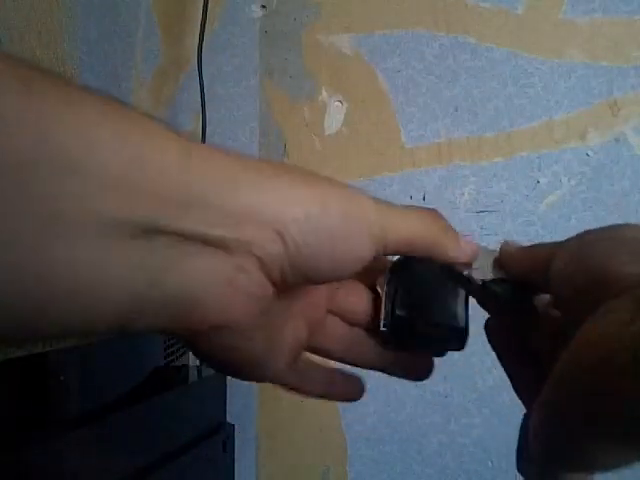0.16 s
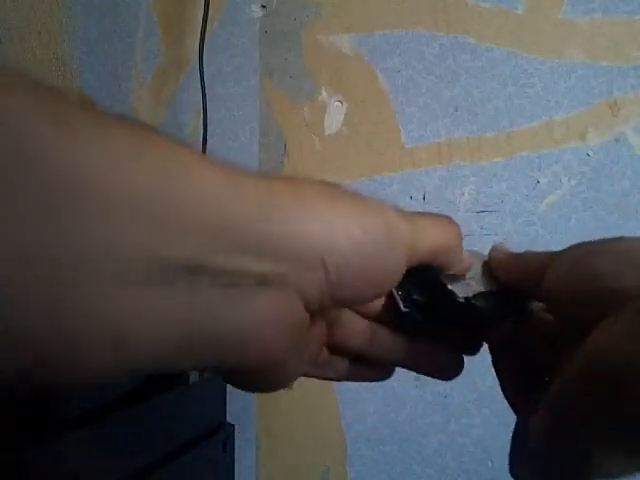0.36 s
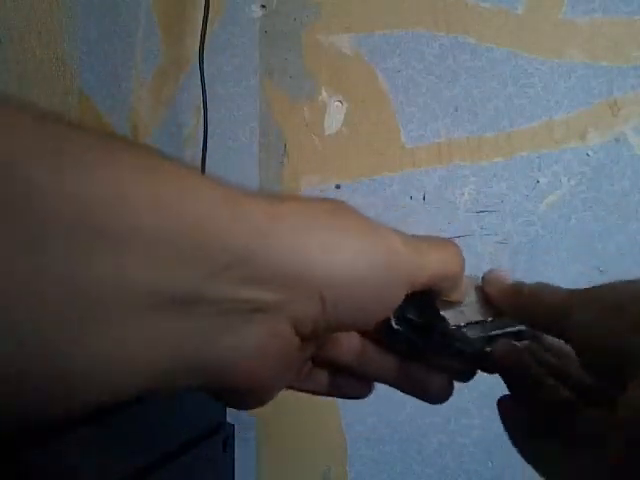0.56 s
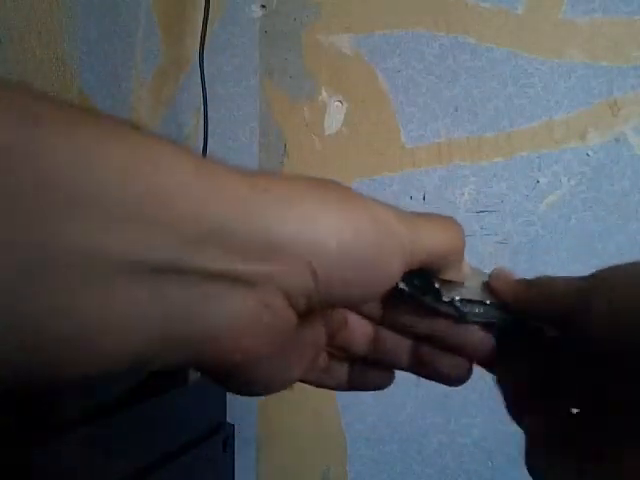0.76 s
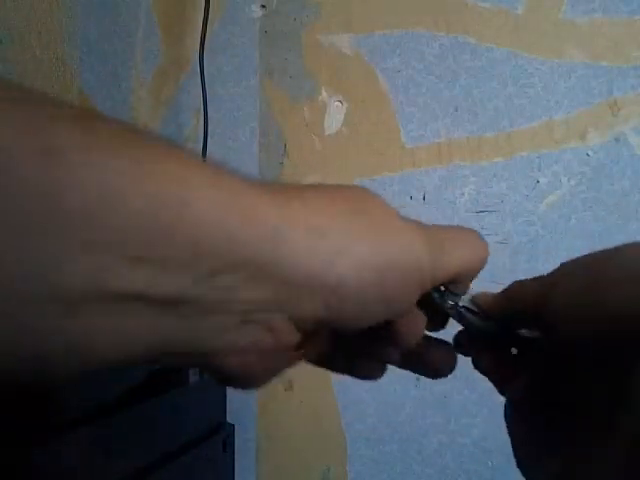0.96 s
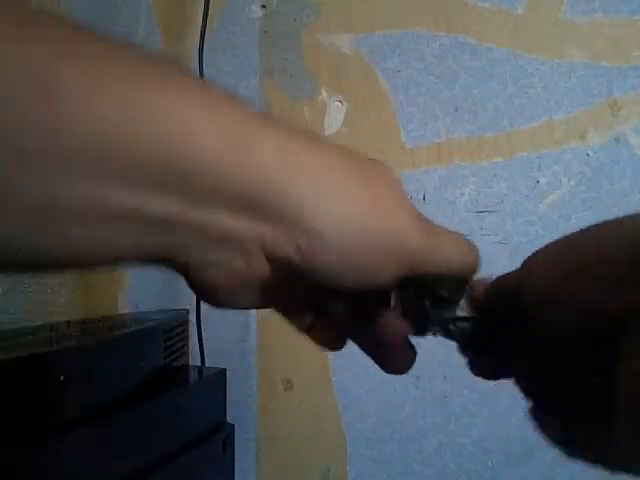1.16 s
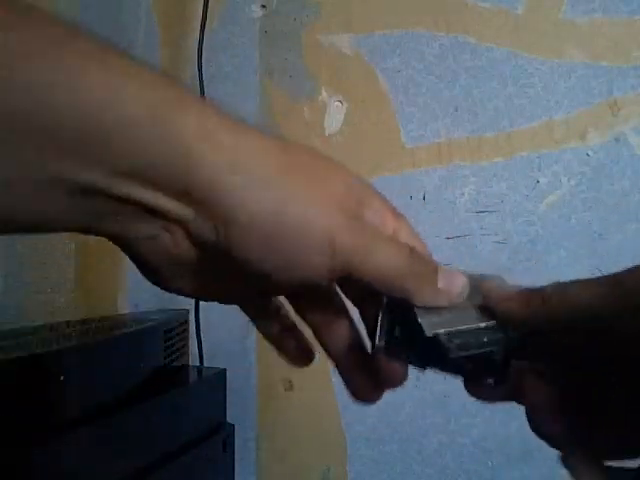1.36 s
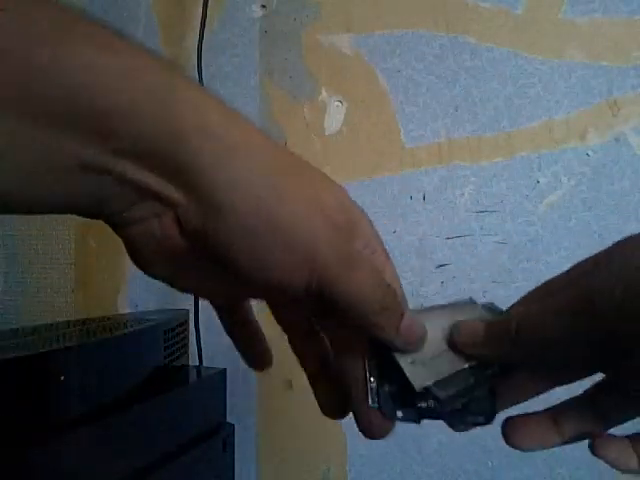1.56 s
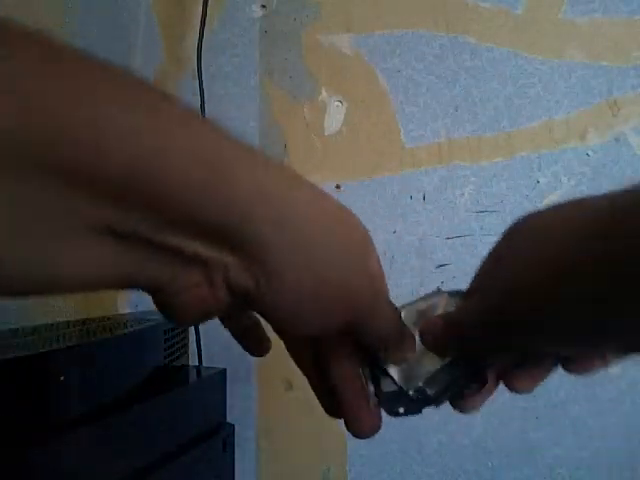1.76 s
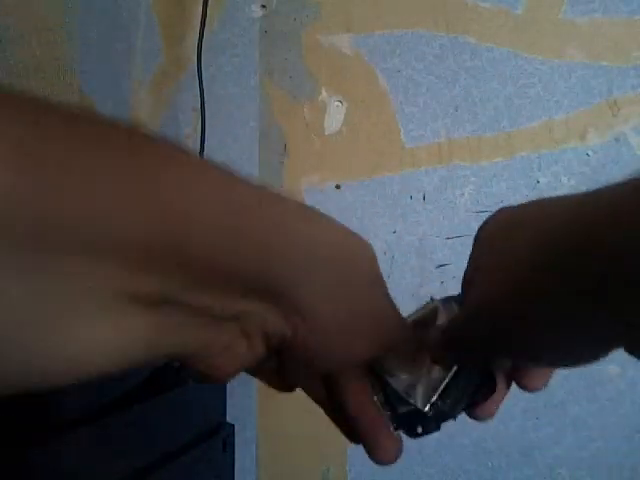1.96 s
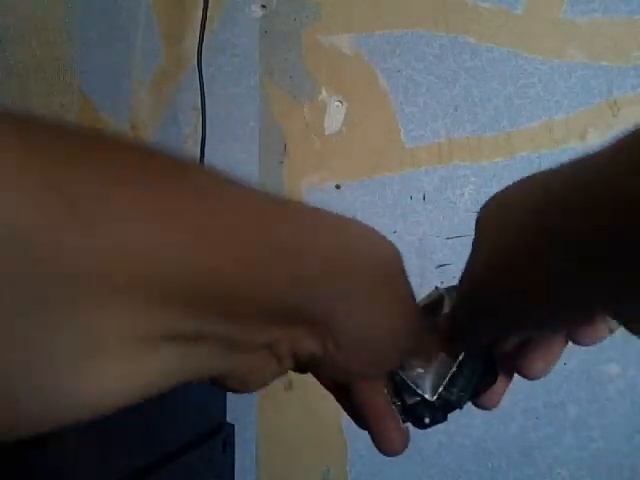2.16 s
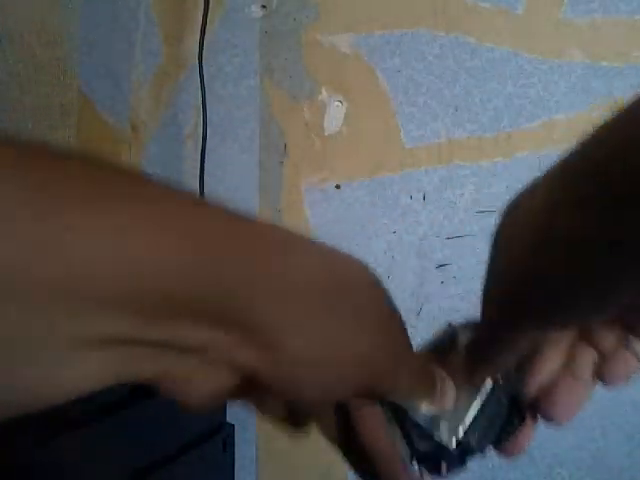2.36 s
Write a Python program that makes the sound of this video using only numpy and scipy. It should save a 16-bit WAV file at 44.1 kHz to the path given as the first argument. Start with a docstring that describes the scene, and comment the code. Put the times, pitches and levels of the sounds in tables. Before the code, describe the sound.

A small device's case being wrenched apart by hand, with sharp snaps and fine crackling.

```python
"""Wrenching a small device apart.

Hands force a plastic and metal case close to a cheap camera microphone, in a small quiet
room with a faint hum. Tiny slips make a fine crackle that follows the strain. Parts snap
with short rings and bright ticks, and catching metal gives thumps and pings."""
import sys
import numpy as np
from scipy import signal
from scipy.fft import rfft, irfft
from scipy.io import wavfile
from scipy.ndimage import uniform_filter1d

SR = 44100
rng = np.random.default_rng(int(sys.argv[2]) if len(sys.argv) > 2 else 0)


def transcribe(u):
    """Save the signal u as a 16-bit wav file named by the first command-line argument.

    u: samples, shape (n,) or (channels, n), limited to [-1, 1]; the rate is SR.
    q: integer samples, one column per channel.
    """
    v = np.clip(np.atleast_2d(u).T, -1, 1)
    q = np.round(v * 32767).astype(np.int16)
    wavfile.write(sys.argv[1], SR, q)


N = 110250


def amp(db):
    return 10 ** (np.asarray(db) / 20)


def unit_rms(x):
    return x / np.sqrt(np.mean(x ** 2) + 1e-20)


def over_time(points):
    return np.interp(np.arange(N) / SR, *np.transpose(points))


def over_frequency(points, hz):
    f, value = np.transpose(points)
    return np.interp(np.log(hz + 1), np.log(f + 1), value)


def highpass(x, hz):
    return signal.sosfilt(signal.butter(4, hz, "high", fs=SR, output="sos"), x)


def bandpass(x, lo_hz, hi_hz):
    return signal.sosfilt(signal.butter(2, [lo_hz, hi_hz], "band", fs=SR, output="sos"), x)


def ring(hz, t60, size=2048, rise_s=0.00016):
    """A struck mode: soft start, exponential decay."""
    t = np.arange(size) / SR
    return (1 - np.exp(-t / rise_s)) * amp(-60 * t / t60) * np.sin(2 * np.pi * hz * t)


def slipping(click_times, click_db, slips_per_s=1600, spread_db=4.5, slip_s=0.0005, rub=0.04):
    """Friction: noise gated by tiny random slips and a steady rub, plus a click per lone slip."""
    sizes = amp(spread_db * np.minimum(rng.exponential(1, N), 4))
    slips = sizes * (rng.random(N) < slips_per_s / SR)
    t = np.arange(400) / SR
    gate = unit_rms(signal.oaconvolve(slips, t * np.exp(-t / slip_s))[:N])
    drive = (gate + rub) * rng.standard_normal(N)
    clicks = np.round(np.array(click_times) * SR).astype(int)
    drive[clicks] += amp(click_db) * rng.choice([-1., 1.], len(clicks))
    return drive


def crackle(width_hz=1110, skirt_db=-6, fizz_db=6.5, hollow_hz=4770):
    """Slips under strain drive the bending part's resonance, a broad skirt and a treble fizz."""
    # crackle under strain: t/s, level/dB
    strain = [(0, -44.5), (.08, -56), (.22, -46.5), (.32, -36), (.44, -41), (.55, -39), (.57, -47),
              (.64, -58.5), (.705, -58.5), (.725, -46.5), (.82, -44), (1.03, -38.5), (1.06, -44),
              (1.2, -44), (1.25, -51.5), (1.35, -55), (1.4, -47.5), (1.44, -54), (1.5, -50.5), (1.66, -57),
              (1.715, -42), (1.8, -39), (1.925, -46.5), (2.12, -43), (2.15, -51), (2.215, -60),
              (2.25, -42.5), (2.32, -55.5), (2.4, -55), (2.44, -47.5)]
    # resonance of the bending part: t/s, f/Hz
    bend = [(0, 2650), (.5, 2720), (.75, 2640), (.88, 2520), (1.05, 2920), (1.8, 2600), (2.05, 2730)]
    # large slips that stand out alone: t/s
    lone_slips = [0.012, 0.1644, 0.185, 0.202, 0.346, .4293, .5015, 0.5349, 0.587, 0.6478, 0.683, 0.7187,
                  .9188, .9733, 1.001, 1.2205, 1.271, 1.3495, 1.387, 1.396, 1.408, 1.4974, 1.518, 1.618,
                  1.649, 1.6832, 1.692, 2.0154, 2.0952, 2.109, 2.227, 2.258, 2.309, 2.3742, 2.39, 2.409]
    # thin ticks, treble only: t/s
    bright_slips = [0.03, .6463, 1.262, 1.458, 1.573, 1.6477, 2.392]
    drive = slipping(lone_slips, click_db=28)
    # a gliding resonance: shift down by its pitch, smooth, shift back up
    carrier = np.exp(2j * np.pi * np.cumsum(over_time(bend)) / SR)
    pole = np.exp(-np.pi * width_hz / SR)
    body = (carrier * signal.lfilter([1], [1, -2 * pole, pole * pole], drive / carrier)).real
    skirt = bandpass(drive, 980, 4550)
    fizz = highpass(drive + 0.44 * slipping(bright_slips, click_db=42), 5100)
    mix = unit_rms(body) + amp(skirt_db) * unit_rms(skirt) + amp(fizz_db) * unit_rms(fizz)
    hollowed = signal.lfilter(*signal.iirnotch(hollow_hz, Q=6.8, fs=SR), mix)
    return amp(over_time(strain)) * hollowed


def room_tone(wash_db=-52, hum_db=-58.5, hum_hz=656, waver_hz=3.54):
    """The quiet room: low steady noise and a wavering hum."""
    # spectrum of the room's noise: f/Hz, relative level/dB
    spectrum = [(35, -17.5), (180, -8.5), (320, -2.5), (580, -9.5), (690, 0), (1000, -11.5), (1600, -13.5),
                (4500, -55)]
    gain = amp(over_frequency(spectrum, np.fft.rfftfreq(N, 1 / SR)))
    wash = unit_rms(irfft(rfft(rng.standard_normal(N)) * gain, N))
    waver = unit_rms(uniform_filter1d(rng.standard_normal(N), size=1500))
    hum = np.sin(2 * np.pi * np.cumsum(hum_hz + waver_hz * waver) / SR)
    return amp(wash_db) * wash + amp(hum_db) * unit_rms(hum)


def grabs():
    """Hands grab the case: short gritty bursts of midrange noise."""
    # grabs at the case: t/s, length/s, level/dB
    grips = [(0.024, 0.013, -33), (0.045, 0.0094, -34)]
    t = np.arange(N) / SR
    hiss, grit = rng.standard_normal((2, N))
    gate = sum(amp(db) * np.sin(np.pi * np.clip((t - s) / length, 0, 1)) for s, length, db in grips)
    rough = hiss * abs(uniform_filter1d(grit, size=40))
    return gate * unit_rms(bandpass(rough, 530, 3100))


def snaps(mode_t60_s=0.0042, crunch_gain=0.25, tick_s=0.00041, tick_hz=5200):
    """A part snaps: a blow and a dying crunch ring it, the shell shakes, a bright tick sounds."""
    # snapping parts: t/s, ring peak/dB, f/Hz, t60/ms, tick peak/dB
    breaks = [(0.0989, -26.5, 3420, 1.8, -19.5), (0.207, -21.5, 2670, 1.4, -20),
              (0.226, -15, 3280, 1.4, -16.5), (0.249, -10, 2780, 9.2, -12), (0.2756, -26, 2620, 1.6, -14),
              (0.2786, 1, 2940, 1.13, -1.5), (0.3173, -1, 2640, 1.5, -3.5), (0.378, -1, 3015, 6.4, -15),
              (0.4839, -8.5, 3080, 3.1, -11), (0.5259, -21, 3080, 3, -23), (0.552, -15, 3200, 1.8, -13.5),
              (0.7221, -21, 3060, 8.1, -12.5), (0.7533, -19.5, 3030, 2.7, -7.5),
              (0.7667, -11.5, 2610, 9.4, -10), (0.8204, -24.5, 3030, 21, -7.5),
              (0.826, -18.5, 2250, 0.87, -9), (0.8472, -26, 2400, 1.3, -18),
              (0.866, -18.5, 2460, 1.5, -17.5), (0.868, -18, 2720, 5.8, -11), (0.9058, -13, 2570, 6.8, -18),
              (0.931, -17, 2740, 4.8, -17), (0.9619, -21.5, 2880, 10, -19), (0.9763, -16, 2900, 5.5, -11.5),
              (1.008, -21, 3030, 6, -14), (1.0186, -17.5, 3060, 13, -19), (1.0262, -20, 3080, 3.2, -8),
              (1.0394, -28, 3330, 3.8, -8), (1.095, -14, 3160, 7.4, -9), (1.122, -20, 3060, 23, -12),
              (1.145, -19.5, 3060, 9.7, -13), (1.1873, -8, 2080, 0.69, -8), (1.7534, -17, 2500, 4.2, -11.5),
              (1.7954, -18.5, 2630, 14, -12), (1.81, -20, 2400, 6.3, -17),
              (1.8156, -17.5, 2550, 1.8, -10.5), (1.8398, -27, 2590, 5.4, -31),
              (1.8452, -13.5, 2400, 3, -14.5), (1.853, -12, 2330, 1.7, -18), (1.8926, -18, 2480, 3.2, -21),
              (1.9556, -9.5, 2600, 2.7, -10.5), (1.9943, -17.5, 2770, 3.4, -10),
              (2.037, -17, 3930, 4.7, -9), (2.0763, -21.5, 2550, 9.1, -27), (2.098, -21, 3370, 9.4, -22),
              (2.117, -18, 2130, 6.4, -19), (2.233, -15.5, 3130, 2.8, -7.5), (2.2411, -11, 3080, 1.8, -6.5)]
    # shell modes that every snap shakes: f/Hz, level re the ring/dB, t60/s
    shell_modes = [(1250, -11.5, 0.0088), (1550, -16.5, 0.019), (3850, -9, 0.01)]
    out, t = np.zeros(N + 2048), np.arange(2048) / SR
    shares = rng.uniform(-0.99, 1, (len(breaks), len(shell_modes)))
    noise = rng.standard_normal((len(breaks), 2, len(t)))
    shell = np.array([amp(db) * ring(hz, t60) for hz, db, t60 in shell_modes])
    for (s, db, hz, t60_ms, tick_db), share, (hiss, grit) in zip(breaks, shares, noise):
        t60 = max(t60_ms, 1) / 1000
        ring_t60 = min(t60, mode_t60_s)  # the crunch carries any longer decay
        crunch = crunch_gain * (1 - ring_t60 / t60) * grit * amp(-60 * t / t60)
        force = (t == 0) + crunch
        part = highpass(signal.fftconvolve(force, ring(hz, ring_t60))[:len(t)], 767)
        tick = highpass(hiss * t * np.exp(-t / tick_s), tick_hz)
        body = amp(db) * (part / abs(part).max() + share @ shell)
        out[round(s * SR):][:len(t)] += body + amp(tick_db) * tick / abs(tick).max()
    return out[:N]


def thumps(outward_s=0.00022, inward_s=0.00013):
    """Metal catches: a one-sided push of air, quicker inward, with a ping and a blow on the case."""
    # hard jolts: t/s, push peak (outward positive), ping peak/dB, blow peak/dB
    jolts = [(0.2787, -0.00092, -15, -13), (0.3179, 0.06, -11, -22), (0.3778, 0.26, -40, -18),
             (0.4836, -0.2, -16, -9), (0.722, 0.011, -12, -46), (0.767, -0.14, -11.5, -16),
             (.8210, 0.14, -9, -20), (0.977, -0.003, -11.5, -20), (1.026, 0.013, -16.5, -35),
             (1.0403, 0.053, -17, -28.5), (1.1727, -0.011, -18, -26), (1.1869, -0.13, -11.5, -17),
             (1.8156, 0.018, -16.5, -31.5), (1.852, -0.34, -6.5, -11.5), (1.956, 0.012, -7.5, -31),
             (1.9934, 0.035, -13.5, -28), (2.037, -0.045, -14.5, -47), (2.2336, 0.055, -9.5, -21.5),
             (2.2414, -0.064, -14, -37)]
    out, t = np.zeros(N), np.arange(512) / SR
    ping = ring(hz=4920, t60=0.0034, size=len(t))
    blow = ring(hz=1620, t60=0.0022, size=len(t))
    for s, peak, ping_db, blow_db in jolts:
        age = t / (outward_s if peak > 0 else inward_s)
        push = peak * age * np.exp(1 - age)
        rings = amp(ping_db) * ping / abs(ping).max() + amp(blow_db) * blow / abs(blow).max()
        out[round(s * SR):][:len(t)] += push + rings
    return out


def knock(t60_s=0.018):
    """A soft knock of the hands rings one low, damped mode."""
    # hand knock: t/s, level/dB, f/Hz
    knocks = [(1.417, -31, 666)]
    out = np.zeros(N)
    for s, db, hz in knocks:
        out[round(s * SR):][:2048] += amp(db) * ring(hz, t60_s)
    return out


def reflections(x, t60_s=0.093, level_db=-17, gap_s=0.00043):
    """The small room returns a short tail, well below the close sound."""
    t = np.arange(SR // 4) / SR
    onset = np.clip(t / gap_s - 1, 0, 1)
    tail = rng.standard_normal(len(t)) * amp(-60 * t / t60_s) * onset
    return amp(level_db) * signal.fftconvolve(x, tail / np.linalg.norm(tail))[:N]


def scene():
    """The device up close and the room behind it, in mono."""
    device = snaps() + thumps() + knock() + grabs() + crackle()
    return (device + reflections(device) + room_tone())[None]


def record(dry, edge_hz=16400):
    """The cheap camera microphone colours the sound, clips on overload and cuts the top treble."""
    # microphone response: f/Hz, level/dB
    response = [(60, 1.5), (3500, 1.5), (4300, -2), (4850, -10.5), (5300, -9), (7300, -5), (9900, -10),
                (14400, -18.5), (15400, -23), (16300, -35)]
    # narrow hollows of the microphone port: f/Hz, half width/Hz, level/dB
    port = [(5840, 290, -14), (8510, 335, -18), (11970, 630, -16.5)]
    hz = abs(np.fft.fftfreq(4096, 1 / SR))
    port_db = sum(db / (1 + ((hz - f) / width) ** 2) for f, width, db in port)
    log_gain = np.log(amp(over_frequency(response, hz) + port_db))
    minimum_phase = -signal.hilbert(log_gain).imag
    colour = np.fft.ifft(np.exp(log_gain + 1j * minimum_phase)).real[:2048]
    clipped = np.clip(signal.oaconvolve(dry, colour[None])[:, :N], -1, 1)
    band_limit = signal.firwin(511, edge_hz, window=("kaiser", 9), fs=SR)
    return signal.oaconvolve(clipped, band_limit[None], "same")


dry = scene()
out = record(dry)
transcribe(out)
```